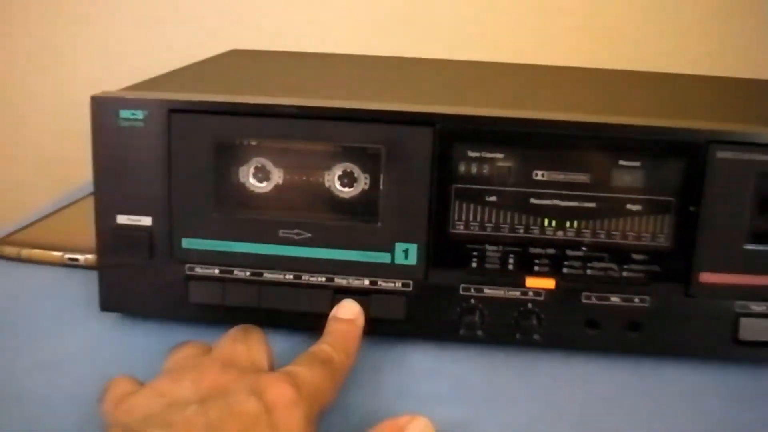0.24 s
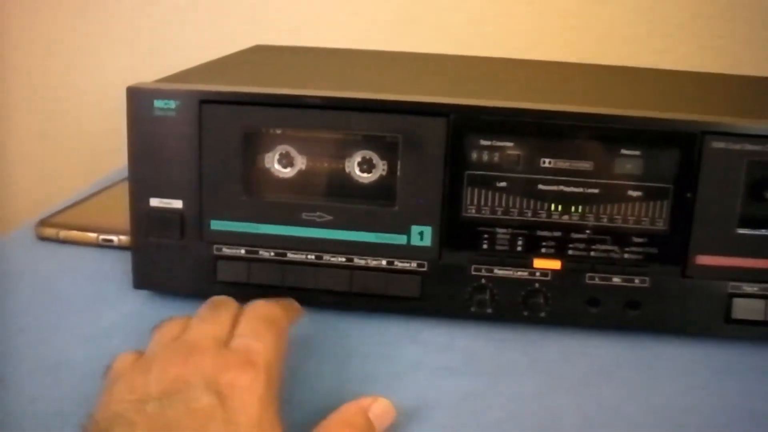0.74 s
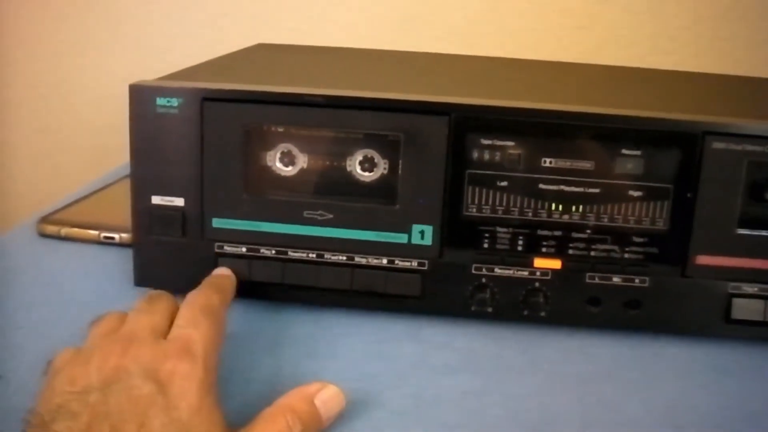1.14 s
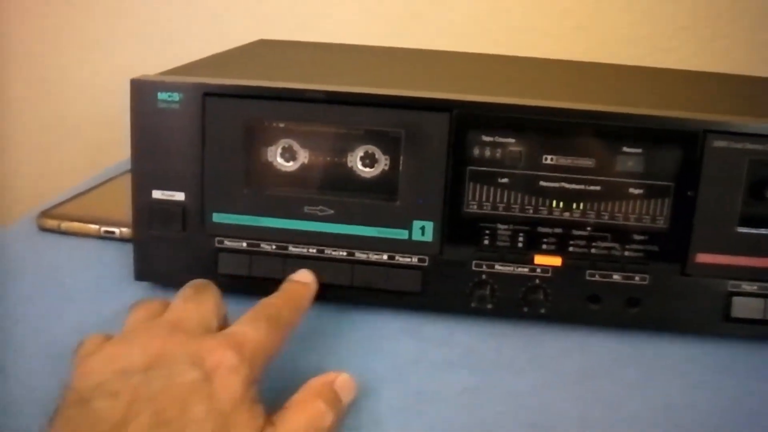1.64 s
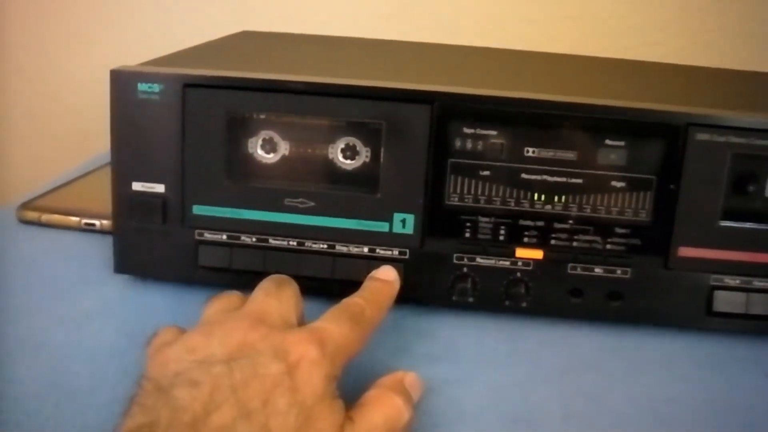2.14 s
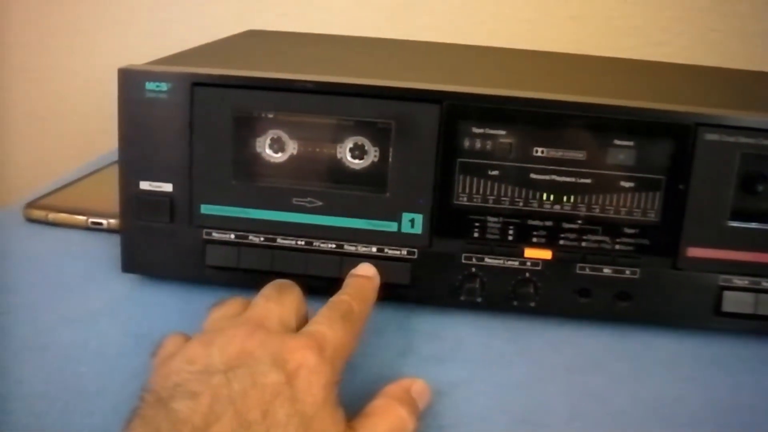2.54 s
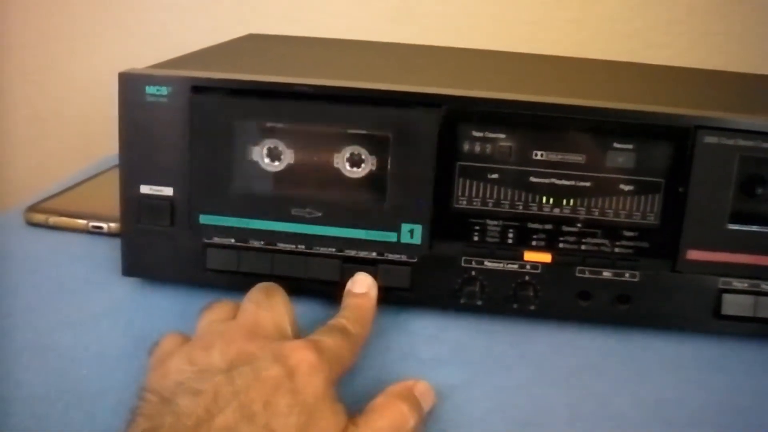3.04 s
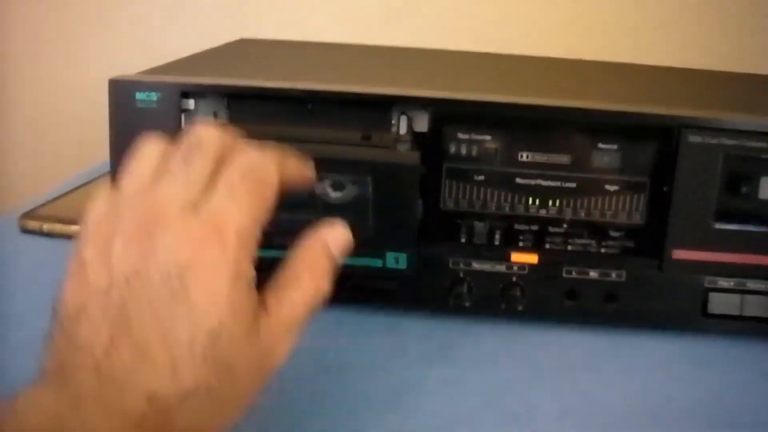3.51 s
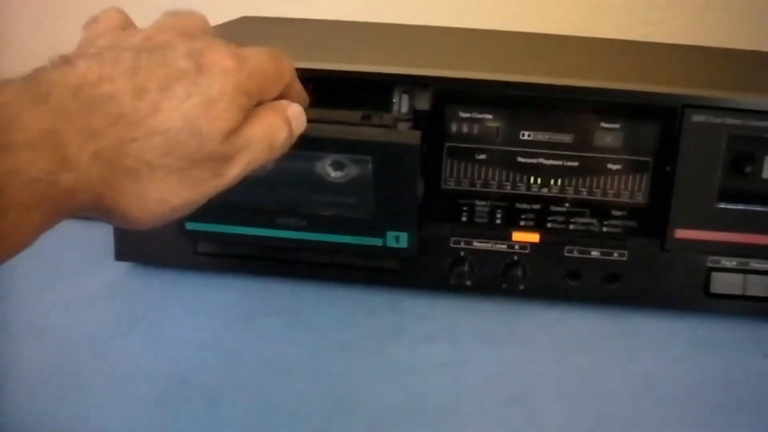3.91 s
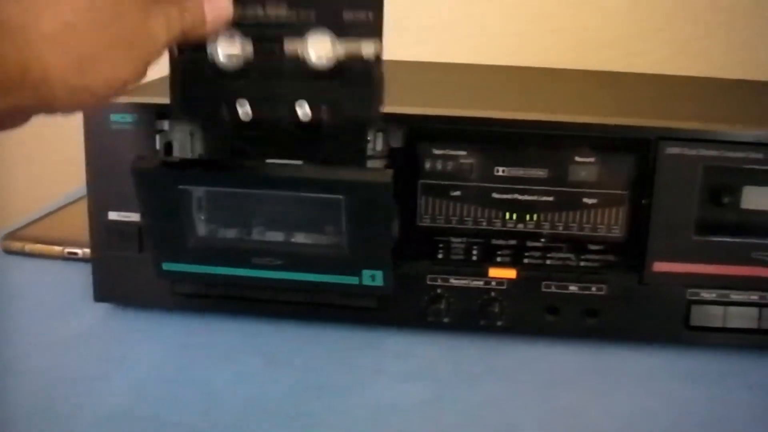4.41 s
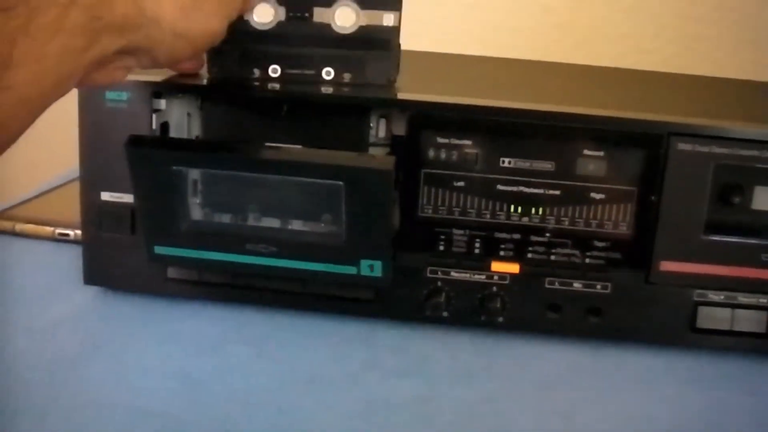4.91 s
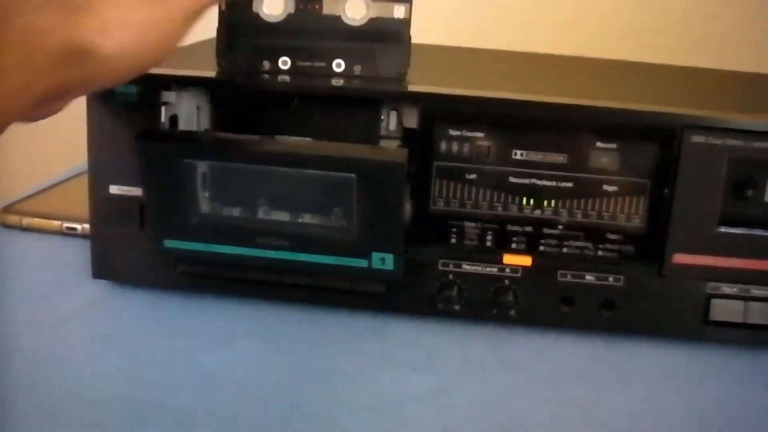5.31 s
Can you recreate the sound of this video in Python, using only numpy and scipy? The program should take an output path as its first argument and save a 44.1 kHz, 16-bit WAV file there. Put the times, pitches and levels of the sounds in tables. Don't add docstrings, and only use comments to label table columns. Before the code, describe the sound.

A close handheld camera microphone in a small, lightly reverberant room hears a cassette deck being worked. At about 0.15 s a key clunks down in a quick cluster; from 0.25 to 0.45 s the lens motor gives a short, rough low buzz. A softer mechanical click follows at 0.52 s. Until 3 s there are mainly sharp, dry lens ticks, irregularly spaced, some in fast even runs, stronger near 0.73, 1.26 and 2.41 s. At 3.08 s the plastic door springs open with a loud clack, rebound and short rattle. Light finger taps follow from 3.3 to 3.8 s, a grip click at 4.02, a faint plastic scrape from 4.15, and a bright snap at 4.38 as the tape comes free. At 4.88 and 4.95 s it lands on the metal lid with loud, hollow double knocks. Ticks continue to the end over steady hiss, faint tones and a thin throbbing whine near 6 kHz.

```python
import sys
import numpy as np
from scipy import signal
from scipy.io import wavfile
from scipy.ndimage import uniform_filter1d

SR = 44100
rng = np.random.default_rng(int(sys.argv[2]) if len(sys.argv) > 2 else 0)


def to_wav(sig):
    pcm = np.clip(np.atleast_2d(sig), -1, 1) * 32767
    pcm = np.round(pcm).astype(np.int16)
    wavfile.write(sys.argv[1], SR, pcm.T)


def volts_from_decibels(level):
    exponent = np.asarray(level, float) / 20
    return 10 ** exponent


N = 245195

# (time [s], peak [dB], treble [dB], rise [s], rattle t60 [s])
KEY_KNOCKS = [
    (.002, -45, -9, 0.014, 1),
    (.142, -27.5, -28, 0.0046, 0.086),
    (.148, -17.5, 7.5, 0.0042, 0.041),
    (.153, -16.5, 6, 0.0016, 0.045),
]
LATCH_KNOCKS = [
    (.489, -37.5, -1.5, 0.0017, 0.11),
    (.514, -45.5, 22, 0.0011, 0.017),
    (.519, -21, 8, 0.0042, 0.043),
    (.54, -33, -5, 0.0034, 0.06),
]
DOOR_KNOCKS = [
    (3.078, -25, -3, 0.0015, 0.046),
    (3.083, -11, 2.5, 0.0031, 0.023),
    (3.0875, -3.5, -2, 0.0025, 0.016),
    (3.099, -7.5, -3, 0.0013, 0.011),
    (3.116, -21, 1, 0.0025, 0.038),
    (3.124, -24.5, 1.5, 0.0013, 0.052),
    (3.137, -22, 1.5, 0.00088, 0.055),
    (3.148, -34, 7, 0.0043, 0.046),
]
GRIP_KNOCKS = [
    (2.843, -38.5, 2, 0.0062, 0.045),
    (4.023, -21.5, -2, 0.00028, 0.027),
    (4.037, -54, -8, .002, 0.026),
]
TOUCH_KNOCKS = [(3.345, -30, -5.5, 0.0075, 0.055), (3.597, -27.5, -9, 0.0087, 0.052),
                (3.65, -45.5, 11, 0.0052, 0.029), (3.7645, -29.5, -8, 0.00058, 0.042),
                (3.7715, -29, 7, 0.00022, 0.0065)]
TAPE_KNOCKS = [(4.266, -34.5, 0, .002, 0.054), (4.352, -26.5, -3, 0.0068, 0.1),
               (4.362, -22, -9, 0.0028, 0.021), (4.378, -14, -34, 0.0064, 0.11),
               (4.3822, -8, 4, 0.00089, 0.029), (4.392, -21, 1, 0.00122, 0.029),
               (4.406, -19, -2, 0.0024, 0.062), (4.48, -33, 11, 0.003, 0.019),
               (4.486, -39, 0.5, 0.0026, 0.12)]
LID_KNOCKS = [
    (4.8788, -6.5, -8, 0.0011, 0.085),
    (4.884, -6.5, -2.5, 0.0008, 0.056),
    (4.893, -7.5, -4, 0.0029, 0.087),
    (4.902, -26, -10, 0.0048, 0.1),
    (4.92, -17.5, -1.5, 0.0087, 0.13),
    (4.9448, -6.5, -3.5, 0.0025, 0.096),
    (4.953, -12.5, 0, 0.0014, 0.067),
    (4.965, -12.5, -1, 0.0047, 0.14),
    (4.98, -33, -5.5, 0.0044, 0.7),
    (5.07, -40.5, -18, 0.0098, 0.25),
]
# (time [s], peak [dB], treble [dB], rise [s], rattle t60 [s])
GUIDE_CATCHES = [(4.172, -32, -12, .006, 0.072), (4.213, -40, -13, 0.0046, .05),
                 (4.245, -41, -5, .004, .05), (4.279, -29.5, -10, .003, .08)]
# (time [s], level [dB])
SLIDE_LEVEL = [(4.14, -59), (4.16, -49.5), (4.2, -44.5), (4.29, -53.5), (4.32, -62), (4.335, -57)]

# colour rows (frequency [Hz], gain [dB]), mode rows (frequency [Hz], level [dB], t60 [s]), modes level [dB]
KEY_BODY = [(100, -48), (220, -0.5), (880, -2.5), (1800, -4), (3400, -8.5), (5000, -4), (7000, -11.5),
            (15000, -14)], [(215, -7, 0.14), (314, 8.5, 0.11), (420, 8.5, 0.039), (900, 4, 0.024),
            (1870, 11, 0.026)], -7
LATCH_BODY = [(100, -24), (250, -7), (600, -8.5), (900, 3), (2000, -11), (3500, -9), (7000, -18),
              (15000, -26.5)], [(800, 0, 0.03), (1220, 0, 0.022), (1940, 1, 0.03)], -6
DOOR_BODY = [(100, -58), (260, -8), (500, -16), (1270, -7), (1800, 0), (4200, -4), (8000, -12),
             (15000, -29)], [(730, -1, .016), (1280, 1, .016), (1790, 9, .04), (4030, 0, .013)], -2.5
GRIP_BODY = [(88, -44), (150, -20), (728, -17), (1160, -9), (2450, 2), (3270, -14), (5100, -9.5),
             (12100, -37), (15000, -66)], [(1970, 0, .02), (2410, 0, 0.02)], -7.5
TOUCH_BODY = [(150, -28), (500, -4.5), (1200, -1), (2300, -2.5), (4000, -13.5), (7000, -10), (9000, -6.5),
              (11500, -14), (14500, -28)], [(893, 0.21, 0.019), (1270, -1.8, 0.013)], -3.1
TAPE_BODY = [(120, -19), (238, -8), (500, -20), (900, -12), (1700, -2.5), (4500, 1), (8750, -4),
             (15000, -20)], [(1318, 0, 0.074), (1576, -4, 0.053), (3080, 19.5, 0.0045), (4600, -15, 0.006),
             (8370, 5, 0.01)], -7.5
LID_BODY = [(140, -67.5), (240, -9.5), (330, -7), (420, -14.5), (800, -8.5), (1410, -9.5), (2430, -10),
            (15000, -26.5)], [(262, -13, 0.056), (345, -12, 0.04), (508, 8, 0.17), (788, 10, 0.068),
            (1010, 0, 0.046), (1436, 10.5, .05), (1700, 5, 0.03), (1857, 14, .06), (2185, 7, .04),
            (2460, 7, .04), (2715, 1, .04)], -6
GUIDE_BODY = [(88, -69), (150, -48), (238, -9), (416, -18.5), (495, -11.5), (1050, -10), (1230, -4),
              (3400, -15), (8580, -18.5), (15000, -29)], [(1290, 5, 0.024), (1733, 5, 0.042),
              (2450, 3, .025), (2850, -2, 0.018)], -9.5
# time [s], frequency [Hz], level [dB], rise [s], t60 [s]
DOOR_SPRING = (3.144, 6310, -30, .01, .13)
# (time [s], frequency [Hz], level [dB], rise [s], t60 [s])
PANEL_RINGS = [(3.084, 1287, -9, 0.0068, 0.039), (3.084, 1975, -14, 0.0037, .03),
               (3.084, 736, -15, 0.0041, 0.023), (3.098, 1290, -18, 0.0036, 0.024),
               (3.098, 1770, -19, .003, .04), (4.9, 800, -13, 0.0039, .05),
               (4.947, 337.4, -11.5, 0.01, 0.089), (5.068, 327, -34, 0.019, 0.088)]

# (frequency [Hz], level [dB], t60 [s], right port phase lead [turns])
LENS_MODES = [(2470, -0.5, 0.0045, 0.2), (3830, 5, 0.0044, 0.14), (5160, 13.5, 0.0027, 0.28),
              (6650, 14, 0.0033, 0.15), (7450, 1.5, 0.018, 0.3), (8960, 9, 0.0018, 0.36),
              (12100, -5.5, 0.0071, 0.2)]
# frequency [Hz], t60 [s], gain [dB]
HOUSING_THUMP = (1043, 0.012, 5.85)
# (start [s], end [s], step period [fields], peak [dB])
FOCUS_HUNTS = [(1.4665, 1.83, 3, -37), (2.346, 3.9, 4, -45), (3.4543, 4.13, 4, -32), (4.7195, 4.83, 3, -38),
               (5.2875, 5.4, 5, -42)]
# (time [s], peak [dB])
REVERSALS = [(0.7274, -17), (2.4127, -16.5), (2.813, -22), (3.9474, -20), (5.215, -15.5)]
# (time [s], peak [dB])
SINGLE_STEPS = [(0.7933, -28.5), (.927, -35), (0.9638, -31), (1.1267, -31), (1.2633, -16.5),
                (1.3654, -25.5), (1.4658, -35), (1.5651, -23), (1.767, -24.5), (2.0684, -26.5),
                (2.48, -36.5), (2.612, -29.5), (2.6494, -29.5), (2.8434, -35), (2.8785, -24.5),
                (2.946, -22.5), (3.2805, -31), (3.3207, -27.5), (3.3882, -31), (3.6511, -31),
                (4.3475, -25.5), (4.548, -21), (4.5875, -30.5), (4.6192, -23.5), (4.666, -30),
                (4.7724, -30), (5.194, -32), (5.2572, -30), (5.3252, -29), (5.5274, -28)]
# (time [s], level [dB])
BUZZ_LEVEL = [(.24, -55), (.265, -47.5), (.35, -45), (.415, -43), (.438, -44.5), (.446, -56), (.485, -66)]
# (time [s], level change [dB])
BUZZ_FALTERS = [
    (.274, -12),
    (.315, -2),
    (.358, -8),
]
# (frequency [Hz], gain [dB])
BUZZ_COLOUR = [(400, -18.5), (720, -1.5), (830, -22), (930, -2), (1200, 8), (1400, -1.5), (3100, -11.5),
               (3600, -4.5), (4500, -1.5), (5000, 4), (5800, -6.5), (6700, 5), (7700, -1), (8100, -8.5),
               (13000, -20)]
# (time [s], level [dB], centre frequency [Hz])
WHINE_TRACK = [(0.47, -51.5, 6230), (1.58, -51.5, 6340), (1.83, -50.5, 6270), (2.37, -57, 6300),
               (3.12, -53, 6300), (3.25, -48.5, 5970), (3.57, -53, 6120), (4.01, -45.5, 6400),
               (4.4, -50, 6260), (4.6, -48, 6130), (5.56, -52, 6250)]

# (frequency [Hz], t60 [s])
ROOM_T60 = [(200, 0.52), (500, 0.67), (1200, 0.35), (2500, 0.22), (5000, 0.18), (10000, 0.2)]
# (frequency [Hz], level [dB])
HISS_COLOUR = [(12, -11), (20, -4), (32, -16.5), (98, -24.5), (416, -11.5), (746, -15), (906, -13.5),
               (1230, -17.5), (1380, -16.5), (1540, -17.5), (3750, -21.5), (6360, -23.5), (7310, -24),
               (12400, -27), (15500, -30.5)]
# (frequency [Hz], left-right likeness [0..1])
HISS_LIKENESS = [(60, 0.055), (300, 0.51), (1400, 0.038), (6000, 0.38), (15000, .2)]
# (frequency [Hz], level [dB])
HUM_TONES = [(375, -73), (416, -73.5), (562, -69.5), (1190, -77.5)]
# (frequency [Hz], gain [dB])
TREBLE_ROLLOFF = [(0, -1), (13000, -3), (13700, -7.5), (14200, -12.5), (15200, -24), (15900, -35), (16600, -80)]


def evened(x):
    return x / np.sqrt(np.mean(x ** 2) + 1e-20)


def read(points, hz):
    f, value = np.transpose(points)
    return np.interp(np.log(hz + 1), np.log(f + 1), value)


def add(mix, s, sound):
    part = mix[..., round(s * SR):][..., :sound.shape[-1]]
    part += sound[..., :part.shape[-1]]


def curve(rows):
    s, *columns = np.transpose(rows)
    t = np.arange(N) / SR
    on = uniform_filter1d(1. * ((t > s[0]) & (t < s[-1])), size=400)
    return (*(np.interp(t, s, c) for c in columns), on)


def ring(hz, db, t60, turns=0, size=8192):
    t, max_cycles = np.arange(size) / SR, 70
    decay_db = -60 * t / np.clip(t60, .002, max_cycles / hz)
    return volts_from_decibels(db + decay_db) * np.sin(2 * np.pi * (hz * t + turns))


def causal(points):
    log_gain = np.log(volts_from_decibels(read(points, abs(np.fft.fftfreq(4096, 1 / SR)))))
    return np.fft.ifft(np.exp(np.conj(signal.hilbert(log_gain)))).real[:2048]


def split(x, treble_db, hz=3200):
    low = signal.sosfilt(signal.butter(2, hz, fs=SR, output="sos"), x)
    return low + volts_from_decibels(treble_db) * (x - low)


def highpass(x, order, hz):
    return signal.sosfilt(signal.butter(order, hz, "high", fs=SR, output="sos"), x)


def knocks(rows, grain_db=2.5):
    force, t = np.zeros(N), np.arange(9000) / SR
    for s, db, treble_db, rise_s, t60 in rows:
        grain = rng.exponential(1, len(t)).clip(0, 4)
        contacts = rng.standard_normal(len(t)) * volts_from_decibels(grain_db * grain)
        attack = np.minimum(t / max(rise_s, 1e-4), 1)
        shape = attack * volts_from_decibels(db - 2.0 - 60 * t / max(t60, .005))
        add(force, s, split(evened(contacts) * shape, treble_db))
    return force


def body(force, colour, modes, modes_db):
    response = sum(ring(*mode) for mode in modes)
    response = volts_from_decibels(modes_db) * response / np.linalg.norm(response)
    thud = causal(colour)
    add(response, 0, thud / np.linalg.norm(thud))
    return signal.oaconvolve(force, response)[:N]


def slide():
    level_db, on = curve(SLIDE_LEVEL)
    treble_db = -7.5 - 0.47 * (level_db + 41)
    clumps = evened(uniform_filter1d(rng.standard_normal(N), size=420))
    grain_db = 2.5 * rng.exponential(1, N).clip(0, 4) + 4 * clumps
    grains = evened(rng.standard_normal(N) * volts_from_decibels(grain_db))
    low = split(grains, -60.0)
    return on * volts_from_decibels(level_db + 7.0) * (low + volts_from_decibels(treble_db + 4) * (grains - low))


def door_spring():
    s, hz, db, rise_s, t60 = DOOR_SPRING
    t, out = np.arange(8192) / SR, np.zeros(N)
    beat = np.cos(np.pi * 15 * (t - rise_s))
    envelope = volts_from_decibels(db - 60 * t / t60) * np.minimum(t / rise_s, 1)
    add(out, s, envelope * np.sin(2 * np.pi * hz * t) * beat)
    return out


def panel_rings():
    t, out = np.arange(8192) / SR, np.zeros(N)
    for s, hz, db, rise_s, t60 in PANEL_RINGS:
        add(out, s, ring(hz, db, t60) * np.minimum(t / rise_s, 1))
    return out


def sparse_tail(points, first):
    taps = np.zeros((2, SR // 2))
    slots = np.arange(first, SR // 2 - 20, 20)
    at = slots + rng.integers(0, 20, (2, len(slots)))
    np.put_along_axis(taps, at, rng.choice([-1., 1.], at.shape), 1)
    hz, t, z = signal.stft(taps, SR, nperseg=128)
    decay = volts_from_decibels(-60 * t / read(points, hz)[:, None])
    tail = signal.istft(z * decay, SR, nperseg=128)[1]
    return tail / np.linalg.norm(tail[0])


def in_room(dry):
    scatter_taps = sparse_tail([(500, 0.088), (8000, 0.016)], first=1)[0, :2000]
    scatter = signal.oaconvolve(highpass(dry, 2, 5000.0), scatter_taps)[:N]
    far = signal.fftconvolve(dry[None], sparse_tail(ROOM_T60, first=200), axes=1)[:, :N]
    shared = far.mean(0)
    return dry + volts_from_decibels(-0.5) * scatter * [[1], [-1]] + volts_from_decibels(-12) * shared + volts_from_decibels(-17.5) * far


def deck():
    parts = [(KEY_KNOCKS, KEY_BODY), (LATCH_KNOCKS, LATCH_BODY), (DOOR_KNOCKS, DOOR_BODY),
             (GRIP_KNOCKS, GRIP_BODY), (TOUCH_KNOCKS, TOUCH_BODY), (TAPE_KNOCKS, TAPE_BODY),
             (LID_KNOCKS, LID_BODY)]
    mix = sum(in_room(body(knocks(rows), *part)) for rows, part in parts)
    guides = body(slide() + knocks(GUIDE_CATCHES), *GUIDE_BODY)
    mix += in_room(guides + door_spring() + panel_rings())
    mix = highpass(mix, 5, 170)
    return mix * volts_from_decibels([[-.7], [.7]])


def motor_steps():
    field_s = 1 / 59.94
    rows = []
    for start, end, fields, db in FOCUS_HUNTS:
        rows += [(s, db - 0.8, 0) for s in np.arange(start, end, fields * field_s)]
    spread_db = 3.0 * rng.uniform(-1, 1, (len(rows), 3)) * [0, 1, 1]
    rows = list(rows + spread_db)
    lead_s, rattle_s, slack_db, slack_thump_db = .0248, .0006, -7.0, -5
    for s, db in REVERSALS:
        rows += [(s - lead_s + k * rattle_s, db + slack_db - k, slack_thump_db) for k in range(3)]
    return rows + [(s, db, 0) for s, db in REVERSALS + SINGLE_STEPS]


def lens_snap():
    size = 900
    detune, spot_db = rng.uniform(-1, 1, (2, len(LENS_MODES))) * [[.05], [4]]
    snap = np.zeros((2, size))
    for side in (0, 1):
        for k, (hz, db, t60, turns) in enumerate(LENS_MODES):
            mode = ring(hz * (1 + detune[k]), db + spot_db[k], min(t60, .006), side * turns, size=size)
            snap[side] += (-1) ** k * mode
    snap *= np.sin(np.pi / 2 * np.minimum(np.arange(size) / 24, 1)) ** 2
    return snap / abs(snap).max()


def lens(count=4):
    steps, thumps, rows = np.zeros((count, N)), np.zeros(N), motor_steps()
    for (s, db, change_db), (late, spot) in zip(rows, rng.random((len(rows), 2))):
        bounce = np.r_[1, np.zeros(int(3 + 30 * late)), .35]
        add(steps[int(count * spot)], s, volts_from_decibels(db + 2.5) * bounce)
        thump_db = -44.5 + change_db + 0.52 * max(db + 32.5, 0)
        add(thumps, s, volts_from_decibels(np.array([thump_db])))
    hz, t60, gain_db = HOUSING_THUMP
    thump = ring(hz, gain_db, t60, size=900) * np.minimum(np.arange(900) / 20.0, 1)
    out = signal.oaconvolve(thumps, thump)[:N] * volts_from_decibels([[-1.0], [1.0]])
    for train in steps:
        out += signal.oaconvolve(train[None], lens_snap(), axes=1)[:, :N]
    return out


def buzz():
    tooth_hz, falter_s = 239.5, 0.0043
    level_db, on = curve(BUZZ_LEVEL)
    t = np.arange(N) / SR
    for s, db in BUZZ_FALTERS:
        level_db = level_db + db * np.exp(-((t - s) / falter_s) ** 2)
    teeth = np.arange(int(N * tooth_hz / SR) - 1)
    at = ((teeth + .17) * SR / tooth_hz).astype(int)
    at += rng.integers(0, 3, len(at))
    drive = .05 * rng.standard_normal((2, N))
    drive[0, at] += 1.2
    drive[1, at + 14 + rng.integers(0, 3, len(at))] += 1
    coloured = signal.oaconvolve(drive, causal(BUZZ_COLOUR)[None], axes=1)[:, :N]
    return on * volts_from_decibels(level_db + 9.0) * evened(coloured)


def whine(width_hz=420):
    drive_hz = 28.05
    level_db, hz, on = curve(WHINE_TRACK)
    turn = np.exp(2j * np.pi * np.cumsum(hz) / SR)
    r = np.exp(-np.pi * width_hz / SR)
    common, own = rng.standard_normal(N), rng.standard_normal((2, N))
    cycle = 2 * np.pi * drive_hz * np.arange(N) / SR
    strong = 3.2 * np.exp(14 * (np.cos(cycle - 3.8) - 1))
    weak = 1.4 * np.exp(14 * (np.cos(cycle - .1) - 1))
    tone = .16 * np.cos(221 * cycle)
    force = (1 + strong + weak) * (0.85 * common + own + tone)
    slow = signal.lfilter([1], [1, -2 * r, r * r], force / turn)
    return on * volts_from_decibels(level_db - 8.0) * evened((turn * slow).real)


def hiss():
    frames, hz = N // 256 + 5, np.fft.rfftfreq(1024, 1 / SR)
    a, b, c, d, patches = rng.standard_normal((frames, 513, 5)).T
    patches = uniform_filter1d(patches, size=12, axis=0)
    patches = evened(uniform_filter1d(patches, size=14, axis=1))
    same = np.clip(read(HISS_LIKENESS, hz), -1, 1)[:, None]
    left = a + 1j * b
    right = same * left + np.sqrt(1 - same ** 2) * (c + 1j * d)
    z = np.array([left, right]) * volts_from_decibels(read(HISS_COLOUR, hz)[:, None] + 1.4 * patches)
    return volts_from_decibels(-50.5) * evened(signal.istft(z, nperseg=1024, noverlap=768)[1][:, :N])


def hum():
    t, out = np.arange(N) / SR, np.zeros(N)
    for hz, db in HUM_TONES:
        waver_db = 3.6 * evened(uniform_filter1d(rng.standard_normal(N), size=9000))
        out += np.sqrt(2) * volts_from_decibels(db + waver_db) * np.sin(2 * np.pi * hz * t)
    return out


def scene():
    return deck() + lens() + buzz() + whine() + hiss() + hum()


def gate(x, floor_db=-96.0, from_hz=7000):
    hz, _, z = signal.stft(x, SR, nperseg=1024, noverlap=512)
    power = uniform_filter1d((abs(z) ** 2).mean(0), size=5, axis=0)
    keep = (power > volts_from_decibels(2 * floor_db)) | (hz < from_hz)[:, None]
    return signal.istft(z * keep, SR, nperseg=1024, noverlap=512)[1][:, :N]


def top_cut(x):
    return signal.sosfilt(signal.butter(12, 16640, fs=SR, output="sos"), x)


def record(dry):
    dip_hz, dip_q, offset = 7920, 22.0, .00275
    wet = signal.lfilter(*signal.iirnotch(dip_hz, dip_q, SR), np.tanh(dry))
    hz = np.fft.rfftfreq(512, 1 / SR)
    top = signal.firwin2(511, hz, volts_from_decibels(np.interp(hz, *np.transpose(TREBLE_ROLLOFF))), fs=SR)
    mix = gate(signal.oaconvolve(wet, top[None], "same")) + offset
    return top_cut(mix)


dry = scene()
out = record(dry)
to_wav(out)
```